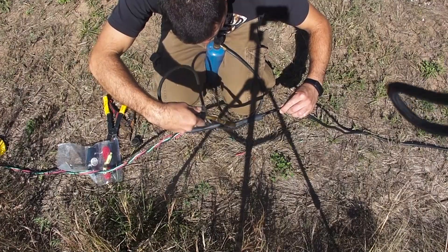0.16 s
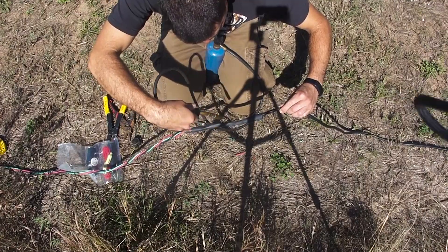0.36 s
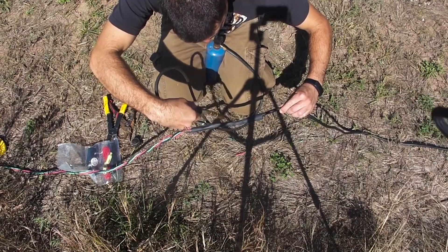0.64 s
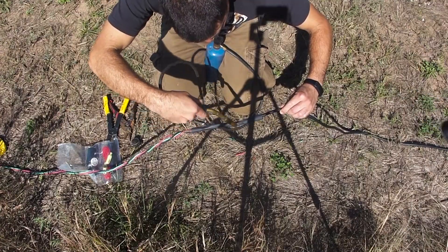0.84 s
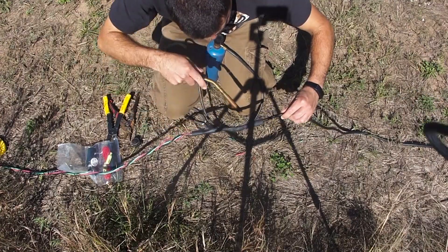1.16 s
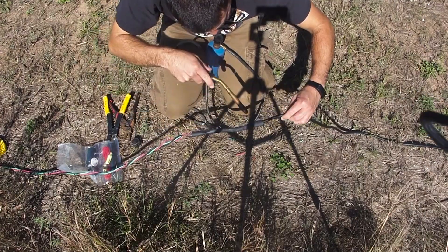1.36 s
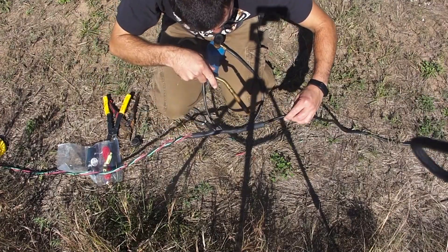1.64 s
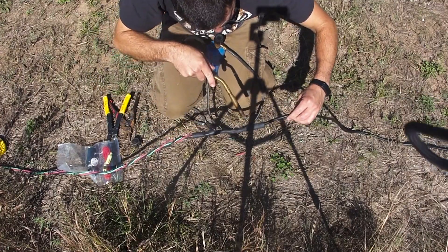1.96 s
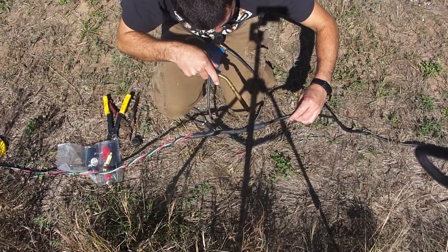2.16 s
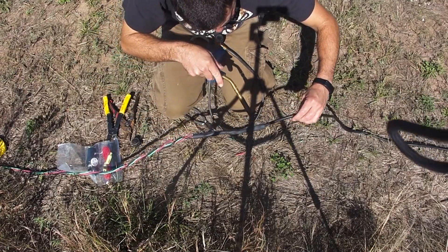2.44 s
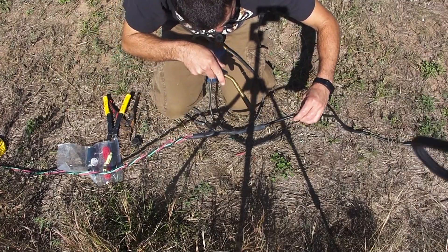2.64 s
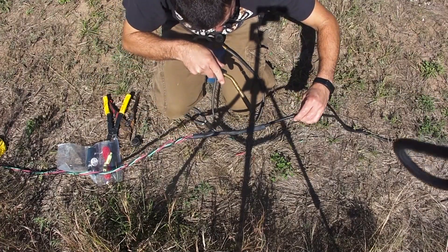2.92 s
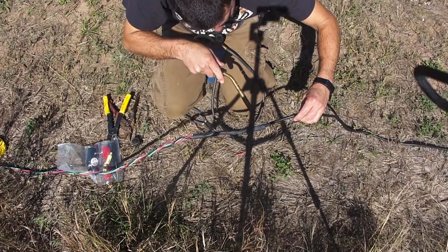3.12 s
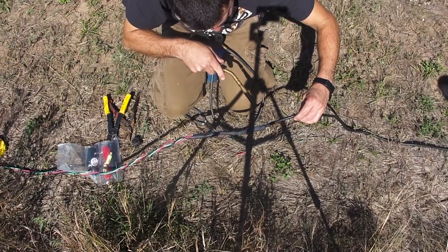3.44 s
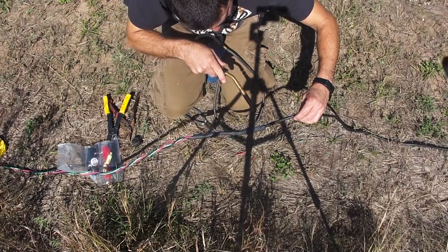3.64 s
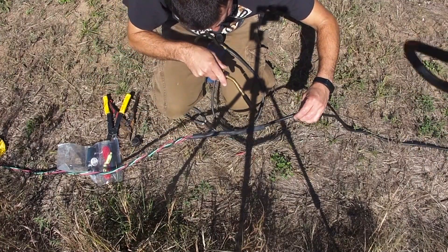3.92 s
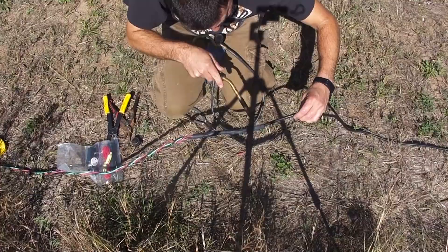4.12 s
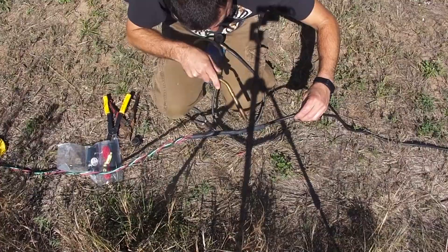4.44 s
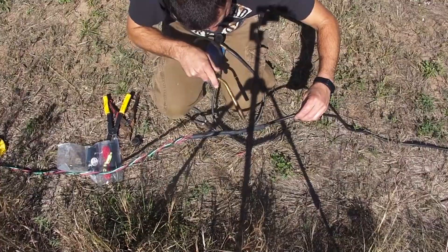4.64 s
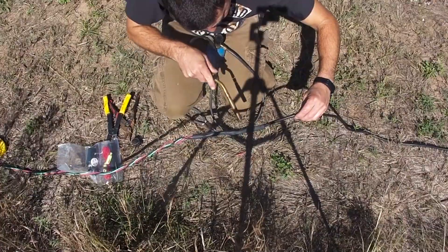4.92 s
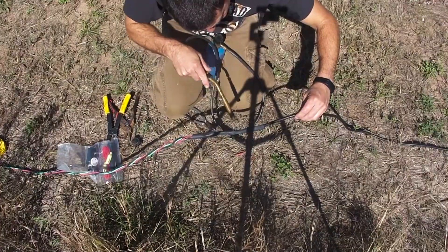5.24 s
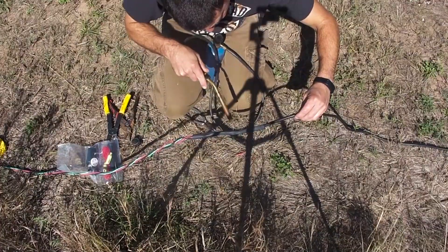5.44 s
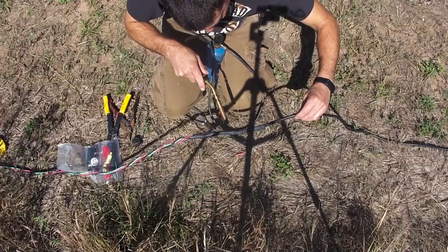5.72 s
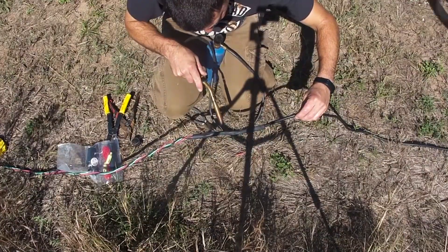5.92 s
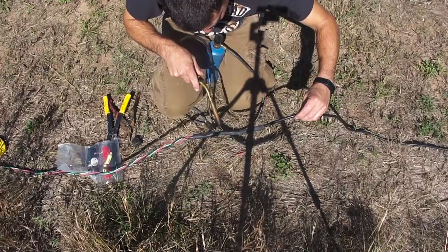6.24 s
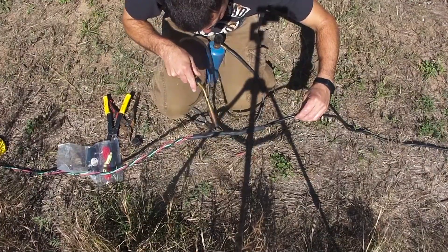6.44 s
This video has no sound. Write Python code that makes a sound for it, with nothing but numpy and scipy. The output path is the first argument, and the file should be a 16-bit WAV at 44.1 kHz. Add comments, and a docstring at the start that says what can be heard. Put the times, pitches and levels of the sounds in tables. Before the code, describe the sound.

The hollow, wavering roar and steady hiss of a gas torch near the ground, joined later by wind buffeting the microphone.

```python
"""First comes the fluttering roar and hiss of a handheld propane torch, close to dry ground outdoors.
The churning flame makes the roar, and gas rushing out of the nozzle makes the hiss. Air rings between
nozzle and ground, so the roar has hollow notes that change as the torch is moved about.
A light breeze brushes the two microphone openings (the ports). From about four seconds on
it gusts hard enough to make them rumble and pop."""
import sys
import numpy as np
from scipy import signal
from scipy.fft import rfft, irfft, next_fast_len
from scipy.io import wavfile
from scipy.ndimage import uniform_filter1d, map_coordinates

SR = 44100
rng = np.random.default_rng(int(sys.argv[2]) if len(sys.argv) > 2 else 0)


def unload_wav(signal):
    """Save mono or channel-first audio to the path in sys.argv[1] as 16-bit WAV at rate SR, clipped to [-1, 1]."""
    wavfile.write(
        sys.argv[1],
        SR,
        np.round(np.clip(np.atleast_2d(signal).T, -1, 1) * 32767).astype(np.int16),
    )


N = 290178
TIME = np.arange(N) / SR

# How the nozzle is held: time_s, openness (0 flame close on its target, 1 burning freely), pitch_ratio
NOZZLE_AIM = [(0, 0.5, 0.99), (.12, 0.96, 1.04), (.22, 0.5, 0.99), (.42, 0.63, 1.03), (.8, 0.4, 1),
              (1.05, 0.36, 1.02), (1.4, 0.04, 0.95), (1.65, 0.32, 1.02), (2.05, 0.48, 1.025),
              (2.45, 0.39, 1.02), (2.65, 0.48, 0.98), (2.95, 0.35, 0.98), (3.6, 0.39, 1.02),
              (4.25, 0.64, 0.97), (4.8, 0.73, 1.036), (5.8, 0.85, 1.005), (6.3, 1, 1.05), (6.58, 1, 1.066)]
# How loud the torch is: time_s, roar_db, hiss_db
TORCH_LEVELS = [(0, -31.5, -48), (0.6, -31, -48), (1.0, -30.5, -47.5), (1.3, -28, -47), (1.85, -31, -47),
                (2.1, -30.5, -47.5), (2.45, -29.5, -47), (3.0, -29.5, -46), (3.4, -29.5, -46),
                (4.0, -31, -48), (4.14, -33, -48.5), (4.19, -36.5, -52.5), (4.4, -38, -53.5),
                (4.6, -33, -49.5), (4.9, -31.5, -46.5), (5.27, -33, -51), (5.44, -33, -51),
                (5.5, -31, -46.5), (5.98, -31, -47.5), (6.3, -32.5, -50.5), (6.55, -29.5, -47)]
# The roar's tone, from low to high: frequency_hz, level_db
ROAR_TONE = [(60, -23.5), (200, -11.5), (340, -16), (480, -3), (620, -1), (800, -3), (1100, -6.5),
             (1500, -6), (1900, -11.5), (2300, -11.5), (2700, -17.5), (4500, -29), (9000, -85)]
# The hollow note between nozzle and ground: time_s, pitch_hz, level_db
HOLLOW_NOTE = [(0, 1239, 4.5), (.4, 1233, 6), (.78, 1203, 4.5), (.97, 1268, 5.5), (1.08, 1202, 6.5),
               (1.24, 1165, 8.5), (1.4, 1212, 9), (1.55, 1235, 7), (1.63, 1154, 9.5), (1.78, 1262, 6),
               (1.9, 1202, 4), (2.1, 1188, 5.5), (2.35, 1233, 8.5), (2.56, 1154, 6), (2.9, 1220, 7.5),
               (3.15, 1225, 6.5), (3.26, 1146, 7), (3.4, 1219, 8.5), (3.56, 1260, 7.5), (3.67, 1160, 3.5),
               (3.75, 1239, 4), (4.2, 1222, -1), (5.8, 1218, -4), (6.58, 1224, -18)]
# Notes of the nozzle, strongest with the flame close on its target: pitch_hz, width_hz, level_db
CLOSE_NOTES = [(1851, 130, 5), (2004, 240, -3), (2600, 320, -7.5)]
# Notes that are strongest with the flame burning freely: pitch_hz, width_hz, level_db
OPEN_NOTES = [(877, 356, 2.5), (1513, 317, 3.5), (2147, 460, -4.5)]
# A high note before the nozzle settles: pitch_hz, width_hz, level_db
HIGH_NOTE = [(2110, 200, -2.5)]
# How that high note fades: time_s, level_db
HIGH_NOTE_FADE = [(0, 1.5), (.5, 0.5), (.75, -21), (1.1, -40)]
# Weak spots between the notes: frequency_hz, width_hz, share_cut_when_close, share_cut_when_open
ROAR_VALLEYS = [(706, 85, 0.27, 0), (1217, 157, 0.069, 0.68), (1700, 73, 0.42, 0), (1924, 150, 0.052, 0.39),
                (2270, 210, 0.23, 0.17)]
# The hiss's tone, with an empty band at about 12-14 kHz cut by the recorder: frequency_hz, level_db
HISS_TONE_WITH_GAP = [(200, -60), (1500, -24), (3400, -5.5), (4500, -0.5), (5400, 6), (5750, 2), (6400, 5),
                      (7300, 3.5), (8400, -1), (9600, -.5), (11300, -14.5), (12000, -49), (13700, -58),
                      (15000, -15.5)]
# Notes of the gas tube that colour the hiss: pitch_hz, width_hz, level_db
TUBE_NOTES = [(3390, 190, -4), (4480, 175, 0.5), (5420, 270, -0.5), (7270, 440, -0.5), (7950, 250, -3.5)]
# Brief swells and dips in the torch's loudness; during gusts the recorder turns the sound down:
# peak_s, length_s, roar_change_db, hiss_change_db
SWELLS_AND_DIPS = [(0.153, 0.025, 0.5, 1), (0.684, 0.07, -2, -1), (1.556, 0.031, -2, -1.5),
                   (1.643, 0.11, 2, 3), (1.661, 0.012, 3, 4), (2.643, 0.04, 2, 3.3), (3.168, 0.052, -2, -1),
                   (3.276, 0.1, 1, 1.5), (3.71, 0.073, 2, 2), (4.015, 0.049, -3.5, -1.5),
                   (4.819, .035, -2.5, 0), (4.918, 0.057, 1.5, 0.5), (5.344, .018, 3.5, 0),
                   (5.411, .016, 2.5, 2), (5.511, 0.023, 4.5, 3), (5.702, .015, 3, 1),
                   (5.752, 0.04, 3, 2.5), (5.837, 0.063, -3, -1.5), (5.875, .025, 2, 2),
                   (5.912, 0.066, 0.5, 4.5), (6.054, 0.04, 2.5, 1.5), (6.12, 0.054, -3.5, -2),
                   (6.271, .035, 1.5, 2), (6.345, 0.043, -2, -2.5), (6.408, 0.0096, 3, 0.5),
                   (6.462, .016, 3.5, 0), (6.5, 0.056, .5, 1.5)]
# Scattered torch sound, compared with the sound in the middle: frequency_hz, level_db
SCATTER_TONE = [(300, -21), (700, -23), (1300, -23.5), (1800, -17), (3400, -20), (6500, -27), (7700, -5),
                (8400, -8), (9200, -11.5), (11000, -15), (15000, -5)]
# Gaps in the torch's tone: frequency_hz, width_hz
TONE_GAPS = [(3000, 910), (4000, 870), (5000, 1350)]
# The wind's strength between gusts: time_s, level_db
BREEZE_LEVELS = [(0, -44), (.55, -47.5), (.7, -55.5), (1.7, -65.5), (2.2, -61), (3.0, -53), (3.35, -43),
                 (3.65, -40), (3.72, -36), (3.98, -37), (4.03, -26), (4.35, -27), (4.43, -33), (4.5, -32.5),
                 (5.36, -30), (5.49, -38), (5.54, -31), (5.95, -31), (6.42, -33), (6.58, -29.5)]
# The tone of the wind's rumble, before air speed shifts it: frequency_hz, level_db
RUMBLE_TONE = [(15, -60), (28, -45), (45, -40), (70, -14.5), (100, -10.5), (140, -1.5), (220, 0.5),
               (330, -2), (500, -9.5), (750, -22), (1000, -27.5), (1500, -41), (3000, -74), (12000, -68)]
# Gusts that swell and fall: peak_s, length_s, peak_db, left_minus_right_db
WIND_GUSTS = [(0.048, 0.051, -37.5, -4.5), (0.352, 0.043, -37.5, -5), (0.463, 0.04, -40, -8.5),
              (2.71, 0.07, -40.5, -1.5), (2.868, 0.034, -34, 1), (3.36, 0.063, -39.5, 5.5),
              (3.737, 0.048, -26, -1), (3.923, 0.036, -31, 5), (4.077, 0.05, -19.5, -4),
              (4.139, .06, -23.5, 5), (4.234, 0.049, -25, 3), (4.321, 0.082, -25.5, 6),
              (4.532, 0.039, -28, -6.5), (4.624, 0.041, -28, 6), (4.74, 0.038, -21, 0),
              (4.878, 0.045, -25, -0.5), (4.959, 0.035, -25, -3), (5.053, 0.059, -24.5, -6),
              (5.124, 0.0301, -22, 4), (5.19, 0.062, -23, 0), (5.318, .025, -25, 6), (5.355, 0.029, -25, 8),
              (5.412, 0.031, -25, 0), (5.69, 0.0451, -26, 4), (5.765, 0.034, -23, 0),
              (5.815, 0.035, -19, -4), (5.938, .03, -25, 1), (5.981, 0.045, -24.5, 1), (6.04, .025, -27, 2),
              (6.085, 0.031, -24.5, 1), (6.143, 0.021, -27.5, 0), (6.201, .03, -24.5, -6),
              (6.316, 0.038, -22, -5), (6.486, 0.052, -27.5, -1.5), (6.552, 0.027, -24, -2)]
# The flame catches one note and hoots: peak_s, length_s, pitch_hz, peak_db
FLAME_HOOTS = [(0.102, 0.041, 978, -31), (0.207, .045, 1273, -29), (0.78, 0.035, 1200, -26),
               (1.193, 0.032, 1174, -29), (1.29, 0.057, 1190, -30), (0.962, .04, 1430, -33),
               (2.633, .035, 904, -28), (2.875, 0.071, 1210, -30), (3.243, 0.055, 1100, -29),
               (3.396, 0.063, 1223, -29.5), (4.765, 0.032, 1016, -30.5), (5.343, 0.015, 970, -25.5),
               (5.878, .03, 831, -26), (6.068, 0.02, 925, -28), (6.231, 0.015, 893, -22.5),
               (6.435, 0.027, 857, -22.5), (6.489, 0.031, 1026, -26)]
# Swirls of air bursting on a port: time_s, peak_db, port (0 left, 1 right), bluntness_ms
PORT_POPS = [(4.0203, -6, 0, 0.41), (4.0703, -2, 1, 0.028), (4.1411, -8, 0, 0.037), (4.1993, -3, 1, 0.35),
             (4.2499, -7, 0, .06), (4.296, -6.5, 0, 0.059), (4.3264, -10, 0, 0.47), (4.35, -6, 0, .4),
             (4.3699, -6.5, 1, 0.34), (4.476, -6.5, 0, 0.34), (4.5141, 1.5, 1, 0.0099),
             (4.5588, 0, 1, 0.31), (4.643, -2.5, 0, 0.69), (4.7147, -4, 1, 0.47), (4.7478, 1.5, 1, 0.027),
             (4.756, -4, 1, .4), (4.9047, -7.5, 1, 0.8), (5.0437, -1, 1, 0.028), (5.1292, -3.5, 0, .02),
             (5.1586, -3.5, 0, 0.41), (5.1943, -2, 1, 0.34), (5.218, -3.5, 1, 0.11), (5.323, -8.5, 0, .6),
             (5.357, -7, 0, 0.52), (5.4142, -3, 1, 0.28), (5.7761, -3, 1, 0.56), (5.8, -5, 1, .4),
             (5.8141, -2.5, 1, .3), (5.942, -5, 0, 0.27), (5.9719, -7.5, 1, .3), (6.004, -3.5, 0, 0.27),
             (6.075, -6.5, 1, 0.31), (6.0935, -6, 0, 0.42), (6.1711, -2, 1, 0.23), (6.1945, -4.5, 1, .4),
             (6.2664, -2.5, 1, 0.42), (6.32, -1, 1, 0.21), (6.3586, -4, 1, 0.57), (6.5565, -7, 0, 0.35)]
# The air speeds up or slackens for a moment: peak_s, length_s, speed_ratio
AIR_RUSHES = [(4.082, .05, 1.41), (4.269, .2, 0.82), (4.751, 0.02493, 1.3), (5.812, .04, 1.34)]


def from_db(db):
    """Turn decibels into a number to multiply a sound by."""
    return 10 ** (np.asarray(db) / 20)


def unit_level(x):
    """Scale a signal so its average power is 1."""
    return x / np.sqrt(np.mean(x ** 2) + 1e-20)


def in_time(rows):
    """Join a table's rows with straight lines, giving each column a value at every sample."""
    time_s, *columns = np.transpose(rows)
    return [np.interp(TIME, time_s, column) for column in columns]


def coloured(x, tone):
    """Make each frequency louder or softer, following a tone table."""
    hz, level_db = np.transpose(tone)
    size = next_fast_len(N)
    bins_hz = np.maximum(np.fft.rfftfreq(size, 1 / SR), 1)
    gain = from_db(np.interp(np.log(bins_hz), np.log(hz), level_db))
    return irfft(rfft(x, size) * gain, size)[..., :N]


def drift(rate_hz):
    """A smooth random wobble of typical size 1, with up to about rate_hz swings a second."""
    size = 2 ** 14
    bins_hz = np.fft.rfftfreq(size, N / SR / size)
    slow = irfft(rfft(rng.standard_normal(size)) / (1 + (bins_hz / rate_hz) ** 4) ** .5, size)
    return np.interp(TIME, np.linspace(0, N / SR, size), unit_level(slow))


def keep_band(x, hz, kind, order):
    """Keep the highs or a middle band; a higher order cuts the rest more sharply."""
    return signal.sosfilt(signal.butter(order, hz, kind, fs=SR, output="sos"), x)


def around(time_s, reach_s):
    """The samples within reach of a moment."""
    return slice(*np.searchsorted(TIME, [time_s - reach_s, time_s + reach_s]))


def hump(peak_s, length_s):
    """A smooth swell and fall of height 1."""
    out, near = np.zeros(N), around(peak_s, 2 * length_s)
    out[near] = np.exp(-(2 * (TIME[near] - peak_s) / length_s) ** 2)
    return out


def ringing(notes, pitch_ratio):
    """Noise rings at a set of breathy notes, which slide up and down together."""
    size = next_fast_len(N + N // 4, real=True)
    bins_hz = np.fft.rfftfreq(size, 1 / SR)
    power = sum((from_db(level_db) / (1 + (2 * (bins_hz - hz) / width_hz) ** 2)) ** 2
                for hz, width_hz, level_db in notes)
    noise = irfft(rfft(rng.standard_normal(size)) * np.sqrt(power), size)
    return np.interp(np.cumsum(pitch_ratio), np.arange(size), noise)  # faster reading raises the pitch


def flame(flutter, flutter_db=1.14, ring_flutter_db=2.0, flicker_db=1.45, open_treble_db=-4, trim_db=0.42):
    """The churning flame burns in quick surges and rings between nozzle and ground."""
    openness, pitch_ratio = in_time(NOZZLE_AIM)
    pitch_ratio = pitch_ratio * (1 + .022 * drift(13))  # the flame bends in the breeze
    surges = rng.standard_normal(N) * from_db(flutter_db * flutter + flicker_db * drift(77))
    notes = flame_notes(openness, pitch_ratio) * from_db(ring_flutter_db * flutter)
    roar = keep_band(coloured(surges, ROAR_TONE) + notes, 130, "high", order=2)
    roar = valleys(ground_echo(roar, openness, pitch_ratio), openness)
    # Treble is beamed along the nozzle, so the free flame, pointing away, sounds duller.
    body = signal.sosfiltfilt(signal.butter(2, 1750, fs=SR, output="sos"), roar)
    roar = body + from_db(open_treble_db * openness ** 2) * (roar - body)
    note_band = keep_band(roar, [1000, 2700], "band", order=4)
    steady = roar / np.sqrt(uniform_filter1d(note_band ** 2, size=3600))  # gas flow holds the power even
    roar_db, _ = in_time(TORCH_LEVELS)
    return from_db(roar_db + trim_db) * steady


def flame_notes(openness, pitch_ratio, close_db=-0.5, open_db=1, least_open_share=0.29):
    """The air around the flame rings; the nozzle's position sets which notes stand out."""
    notes = hollow_note() + (1 - openness) * from_db(close_db) * swirling(CLOSE_NOTES)
    notes += np.maximum(openness, least_open_share) * from_db(open_db) * swirling(OPEN_NOTES, pitch_ratio)
    fade_db, = in_time(HIGH_NOTE_FADE)
    return notes + from_db(fade_db) * ringing(HIGH_NOTE, pitch_ratio)


def hollow_note(width_hz=185, evenness=0.18, wander=.02, trim_db=0.5):
    """The flame feeds a note under the nozzle, which partly keeps itself going and glides with the hand."""
    hz, level_db = in_time(HOLLOW_NOTE)
    pitch_ratio = hz / hz.mean() * (1 + wander * drift(12.96))
    note = ringing([(hz.mean(), width_hz, trim_db)], pitch_ratio)
    loudness = unit_level(np.abs(signal.hilbert(note, next_fast_len(N))[:N]))
    return from_db(level_db) * note / (loudness + 1e-6) ** evenness


def swirling(notes, pitch_ratio=1, wander=.014, waver_db=2.0, rate_hz=12):
    """Each note wavers in pitch and strength on its own as the hot air swirls."""
    out = np.zeros(N)
    for note in notes:
        ring = ringing([note], pitch_ratio * (1 + wander * drift(rate_hz)))
        out += ring * from_db(waver_db * drift(rate_hz))
    return out


def ground_echo(roar, openness, pitch_ratio, delay_s=0.001505, close_gain=0.058, open_gain=-0.22):
    """The echo off the ground cancels some frequencies, which slide along with the open notes."""
    gain = close_gain + (open_gain - close_gain) * openness ** 6.1  # flips sign near the open end
    return roar + gain * np.interp(TIME - delay_s / pitch_ratio, TIME, roar)


def valleys(roar, openness):
    """Weak spots between the notes deepen and fill as the nozzle travels."""
    for hz, width_hz, close_share, open_share in ROAR_VALLEYS:
        share = close_share * (1 - openness ** 2) + open_share * openness ** 2
        roar = roar - share * signal.lfilter(*signal.iirpeak(hz, hz / width_hz, fs=SR), roar)
    return roar


def gas_jet(flutter, flutter_db=0.7, flicker_db=1.72, split_hz=7500, tube_db=3, sway_hz=7, trim_db=2.5):
    """Gas leaving a tiny hole hisses, rings in the tube and trembles with the flame."""
    hiss = coloured(rng.standard_normal(N), HISS_TONE_WITH_GAP)
    hiss += from_db(tube_db) * ringing(TUBE_NOTES, 1 + .006 * drift(sway_hz))
    lows = signal.sosfiltfilt(signal.butter(4, split_hz, fs=SR, output="sos"), hiss)
    highs = hiss - lows
    tilt_db = 0.77 * drift(sway_hz)  # the jet brightens and dulls as it sways
    lows = lows * from_db(flicker_db * drift(70) - tilt_db)  # big and small swirls flicker on their own
    highs = highs * from_db(flicker_db * drift(79) + tilt_db)
    _, hiss_db = in_time(TORCH_LEVELS)
    return from_db(hiss_db + trim_db + flutter_db * flutter) * unit_level(lows + highs)


def torch(flutter_hz=50, swell_hz=6, swell_db=0.5, left_db=-0.13):
    """Flame and jet stand in the middle and swell together; a little scattered sound widens them."""
    flutter = unit_level(keep_band(drift(flutter_hz), 18, "high", order=2))
    swell = unit_level(keep_band(drift(swell_hz), swell_hz / 2, "high", order=2))
    changes_db = sum(np.outer([roar_db, hiss_db], hump(peak_s, length_s))
                     for peak_s, length_s, roar_db, hiss_db in SWELLS_AND_DIPS)
    roar_gain, hiss_gain = from_db(changes_db + swell_db * swell)
    middle, scattered = [roar_gain * flame(flutter) + hiss_gain * gas_jet(flutter) for _ in range(2)]
    middle = middle + hoots()
    side = coloured(scattered, SCATTER_TONE)
    sound = np.array([(middle + side) * from_db(left_db), (middle - side) * from_db(-left_db)])
    for hz, width_hz in TONE_GAPS:
        sound = signal.lfilter(*signal.iirnotch(hz, hz / width_hz, fs=SR), sound)
    return sound


def wind(gusts, widening=0.25, lean_db=1.0, sway_db=1.5, sway_hz=7.09):
    """Gusts ride on the breeze and beat on both ports; each port feels the wind a little differently."""
    breeze_db, = in_time(BREEZE_LEVELS)
    breeze = from_db([breeze_db + side_db + sway_db * drift(sway_hz) for side_db in (lean_db, -lean_db)])
    left_db, right_db = 10 * np.log10(gusts + breeze ** 2)
    ports = np.array([rumble(left_db, calm_speed=.72), rumble(right_db, calm_speed=.92)]) + pops()
    return ports - widening * ports[::-1]  # taking a share of each port from the other widens the sound


def rumble(level_db, calm_speed, gust_speed=.25, strong_wind_db=-20, lump_db=3.0, trim_db=2.02):
    """Swirls of air roll over one port in lumps; faster air sweeps them past sooner and sounds higher."""
    swirls = coloured(rng.standard_normal(N) * from_db(lump_db * drift(45)), RUMBLE_TONE)
    speed = calm_speed + gust_speed * from_db(level_db - strong_wind_db)
    for peak_s, length_s, speed_ratio in AIR_RUSHES:
        speed = speed * speed_ratio ** hump(peak_s, length_s)
    swept = map_coordinates(swirls, [np.cumsum(speed)], order=3, mode="mirror")
    return from_db(level_db + trim_db) * swept / np.sqrt(uniform_filter1d(swept ** 2, size=3000))


def gust_power():
    """Each gust swells and falls, often harder on one side; gives the power at the left and right port."""
    return sum(from_db([[peak_db + lean_db / 2], [peak_db - lean_db / 2]]) ** 2 * hump(peak_s, length_s)
               for peak_s, length_s, peak_db, lean_db in WIND_GUSTS)


def hoots(spread_hz=45):
    """The flame catches one narrow, unsteady note, which swells for a moment."""
    out = np.zeros(N)
    wobble = drift(spread_hz) + 1j * drift(spread_hz)  # shakes both loudness and pitch
    for peak_s, length_s, hz, peak_db in FLAME_HOOTS:
        near = around(peak_s, 2 * length_s)
        swell = hump(peak_s, length_s)[near]
        tone = np.real(wobble[near] * np.exp(2j * np.pi * hz * TIME[near]))
        out[near] += from_db(peak_db) * swell * tone / np.sqrt(np.average(tone ** 2, weights=swell ** 2))
    return out


def pops(width_ms=0.3, port_hz=280, port_width_hz=130, ring_gain=0.63, trim_db=-0.5):
    """A bursting swirl is one pressure spike, sharp or blunt; the port swings back and rings briefly."""
    spikes = np.full((2, N), 1e-18)
    for time_s, peak_db, port, blunt_ms in PORT_POPS:
        near = around(time_s, .01)
        away_ms = np.hypot((TIME[near] - time_s) * 1000, blunt_ms) - blunt_ms  # rounds off the tip
        spikes[port, near] += from_db(peak_db) * np.exp(-away_ms / (width_ms + 0.21 * blunt_ms))
    ring = signal.lfilter(*signal.iirpeak(port_hz, port_hz / port_width_hz, fs=SR), spikes)
    return from_db(trim_db) * keep_band(spikes + ring_gain * ring, 140, "high", order=3)


def scene(deepest_dip_db=-1, dip_delay_s=0.02, strong_gust_db=-23):
    """The torch's sound, turned down briefly after each strong gust, with wind on the microphone."""
    gusts = gust_power()
    gust_strength = np.sqrt(gusts.mean(axis=0)) / from_db(strong_gust_db)
    dip_db = deepest_dip_db * np.tanh(np.interp(TIME - dip_delay_s, TIME, gust_strength))
    return torch() * from_db(dip_db) + wind(gusts)


def record(dry, cutoff_hz=15800):
    """The very highest treble is cut off steeply."""
    return signal.sosfilt(signal.ellip(12, .1, 90, cutoff_hz, fs=SR, output="sos"), dry)


dry = scene()
out = record(dry)
unload_wav(out)
```